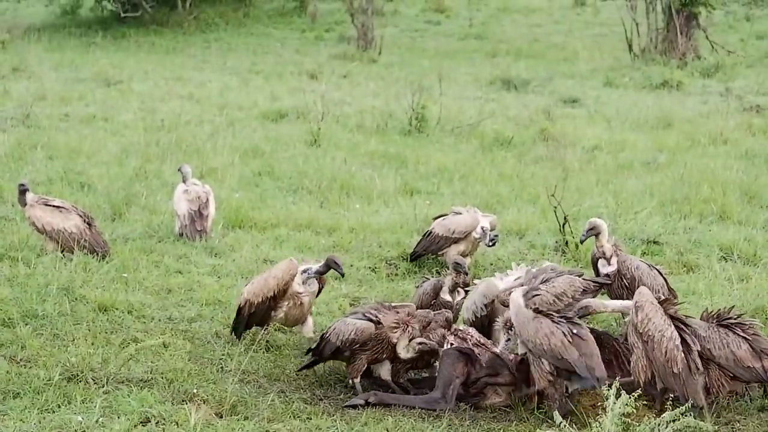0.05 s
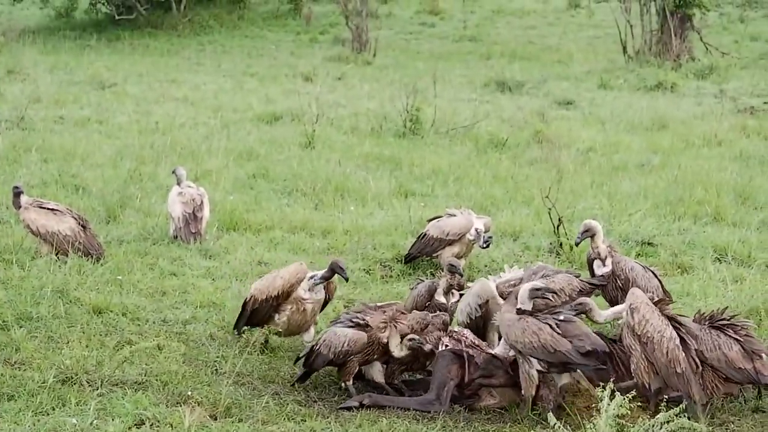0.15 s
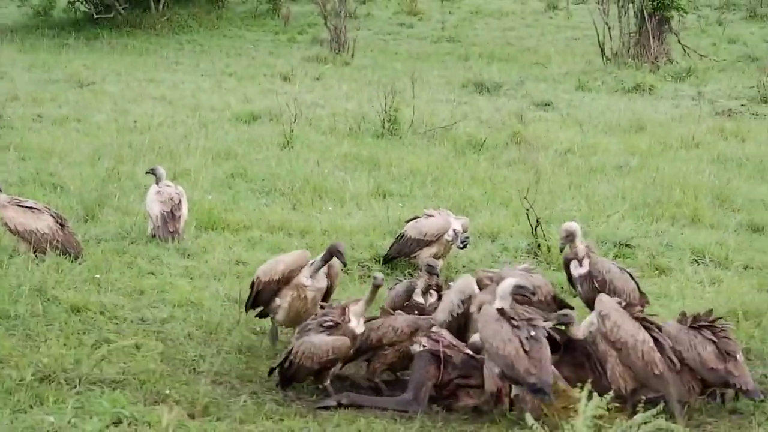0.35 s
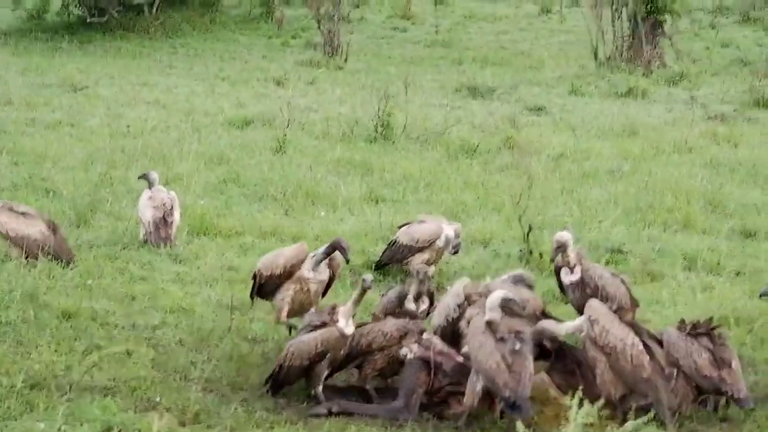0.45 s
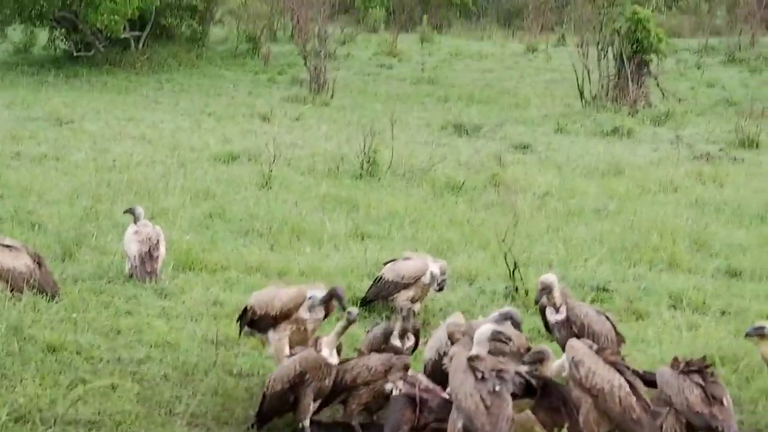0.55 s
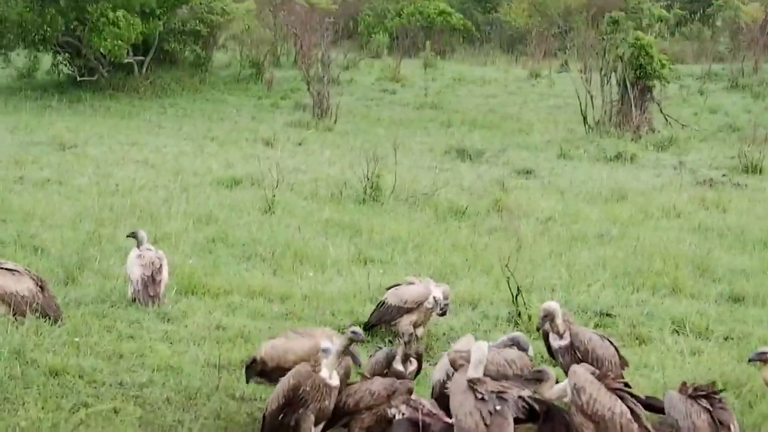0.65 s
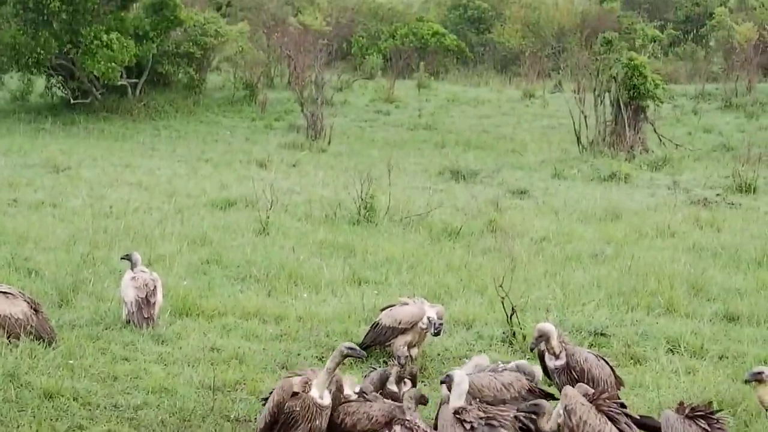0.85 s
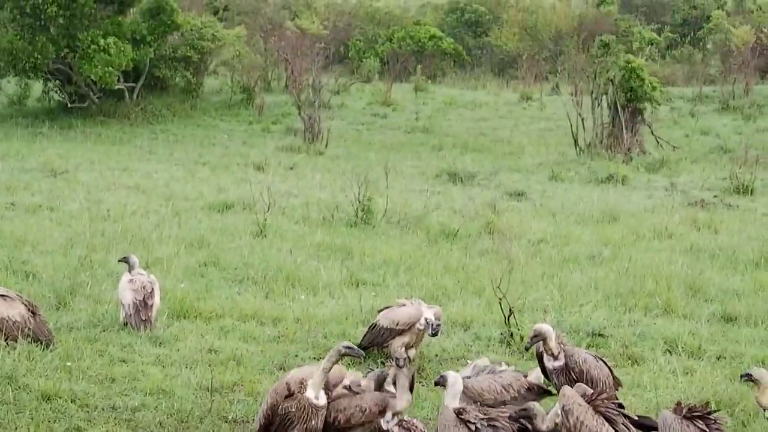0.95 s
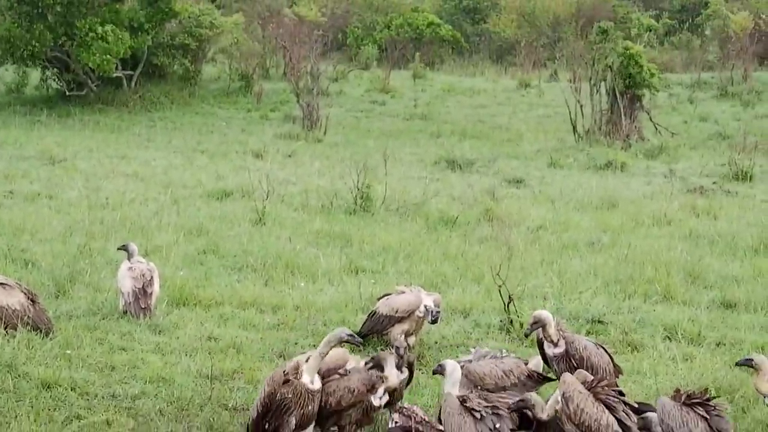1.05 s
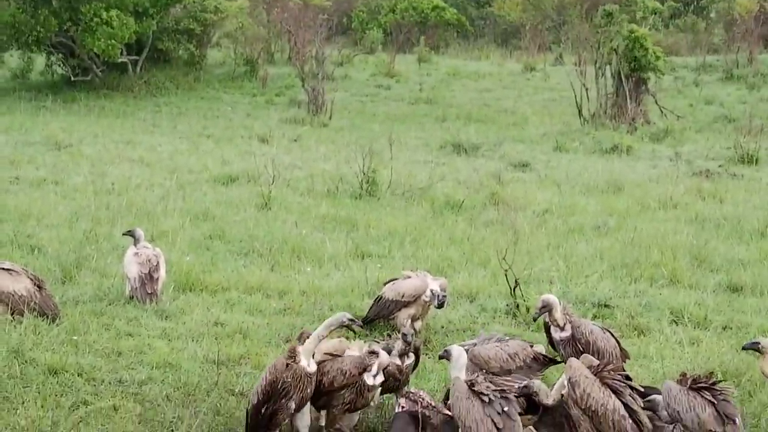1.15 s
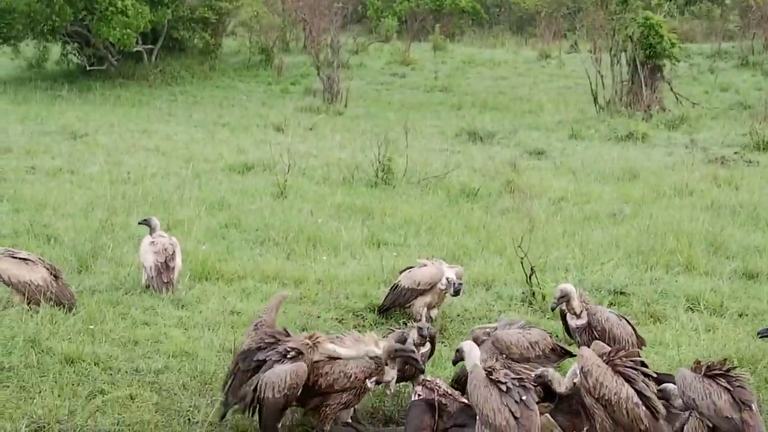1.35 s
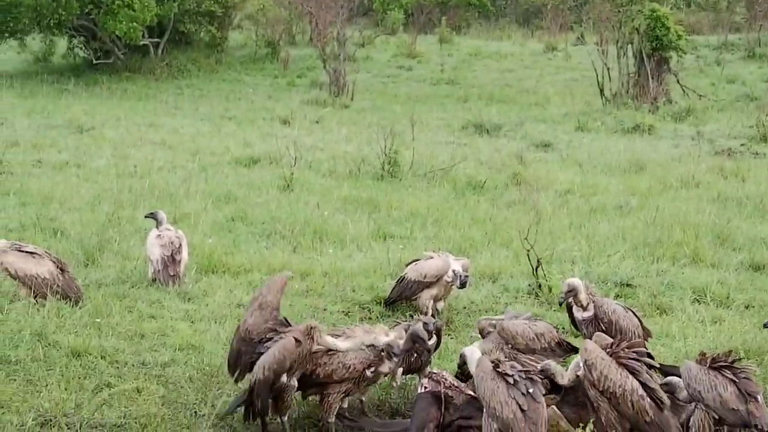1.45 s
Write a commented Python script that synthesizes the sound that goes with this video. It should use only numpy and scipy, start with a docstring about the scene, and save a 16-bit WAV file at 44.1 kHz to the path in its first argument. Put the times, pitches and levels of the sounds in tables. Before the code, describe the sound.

Feeding vultures hiss steadily in the background on open grassland. From about 0.2 to 0.9 seconds one bird holds a long, hoarse, sagging hiss, with harsher rasps over it at 0.2-0.5 and 0.6-0.8. A sharp, bright snap cuts through at 0.42. Quieter flock hissing continues, with small scuffs near 1.25 and 1.35, over soft low rumble, light wind and thin even hiss, until 1.5.

```python
"""One vulture holds a long hoarse hiss over a carcass on open grassland, some metres from a camera.
Two harsher rasps swell over it and the flock hisses on behind: fluttering air through throat resonances.
Narrow noise bands wheeze as the long hiss opens and closes; a sharp snap is a burst of decaying sines.
Knocks and scuffs are short noise bursts; shaped noise makes outdoor rumble, even hiss and light wind."""
import sys
import numpy as np
from scipy import signal
from scipy.fft import rfft, irfft
from scipy.io import wavfile

SR = 44100
rng = np.random.default_rng(int(sys.argv[2]) if len(sys.argv) > 2 else 0)


def master_out(mix):
    """Clip the mix to full scale and print it as 16-bit PCM to the path in sys.argv[1]."""
    frames = np.transpose(np.atleast_2d(mix))
    ceiling = np.clip(frames, -1, 1)
    pcm = np.round(ceiling * 32767).astype(np.int16)
    wavfile.write(sys.argv[1], SR, pcm)


N = 66150


def undb(db):
    """Amplitude factor of a level in dB."""
    return 10 ** (np.asarray(db) / 20)


def unit(x):
    """Scale to RMS 1."""
    return x / np.sqrt(np.mean(x ** 2))


def times():
    """Time of each sample in s."""
    return np.arange(N) / SR


def freqs():
    """Frequency of each spectral bin in Hz, at least 1."""
    return np.maximum(np.arange(N // 2 + 1) * SR / N, 1)


def curve(points):
    """Gain over time along (s, dB) points."""
    return undb(np.interp(times(), *np.array(points).T))


def colour(points):
    """Gain per frequency along (Hz, dB) points, on a log frequency axis."""
    hz, db = np.array(points).T
    return undb(np.interp(np.log(freqs()), np.log(hz), db))


def resonances(table):
    """Gain per frequency of steep resonances side by side, their powers summed."""
    power = 0
    for hz, width_hz, db in table:
        detune = 2 * (freqs() - hz) / width_hz
        power = power + undb(db) ** 2 / (1 + detune ** 2) ** 2
    return np.sqrt(power)


def shaped(x, gain):
    """Filter by a gain per frequency."""
    return irfft(rfft(x) * gain, N)


def noise():
    """White noise of spread 1."""
    return rng.standard_normal(N)


def walk(rate_hz):
    """Random drift of RMS 1, mostly slower than rate_hz."""
    return unit(shaped(noise(), 1 / (1 + (freqs() / rate_hz) ** 2) ** 2))


def stereo(mid, side, pan_db=0):
    """Left and right from mid and side; pan_db is left over right."""
    return np.array([(mid + side) * undb(pan_db / 2), (mid - side) * undb(-pan_db / 2)])


def effort(start_s, attack_s, hold_s, release_s, db, slope_db_per_s):
    """Push of air: linear attack and release, with a level that slopes in dB throughout."""
    t = times() - start_s
    attack = np.clip(t / attack_s, 0, 1)
    release = np.clip((attack_s + hold_s + release_s - t) / release_s, 0, 1)
    return attack * release * undb(db + slope_db_per_s * t)


def hiss(throat, flutter_hz, rough, low_hz):
    """Turbulent air with an uneven flutter, through a throat that passes little below low_hz: mid, side."""
    # Each row: frequency in Hz, side level in dB.
    side_points = [(500, -1), (1400, -23.5), (1850, -15), (2300, -22.5), (3100, -9.5), (4000, -14),
                   (4600, -10.5), (5500, -12.5), (9000, -9)]
    phase = 2 * np.pi * np.cumsum(flutter_hz * np.exp(.3 * walk(67))) / SR
    gate = 1 + rough * np.cos(phase)
    gain = resonances(throat) / np.sqrt(1 + (low_hz / freqs()) ** 20)
    mid = unit(shaped(noise() * gate, gain))
    side = unit(shaped(noise() * gate, gain))
    return np.array([mid, shaped(side, colour(side_points))])


def long_hiss():
    """One long push of air with a faint fast flutter, sagging as it is held."""
    # Start, attack, hold, release, all in seconds.
    timing = (.188, .022, .655, .035)
    # Throat. Each row: frequency in Hz, width in Hz, level in dB.
    throat = [(645, 780, -22), (975, 107, -10), (1083, 56, -9.5), (1368, 164, 2), (1700, 120, 0),
              (1900, 110, -3), (2040, 98, -6), (2275, 150, 2.5), (2600, 210, -3), (2820, 210, -7.5),
              (3180, 170, -21.5), (3860, 190, -16.5), (4470, 470, -17), (5600, 990, -26),
              (8000, 2900, -34.5)]
    push = effort(*timing, db=-32.5, slope_db_per_s=-5)
    return hiss(throat, flutter_hz=120.5, rough=0.045, low_hz=527) * push


def rasps():
    """Short pushes through a harsher throat, with a slower, deeper flutter and a slight level tremor."""
    # Each row: start, attack, hold, release in seconds, level in dB, slope in dB per s.
    pushes = [(0.219, 0.079, 0.038, 0.14, -23, 0), (0.573, 0.026, 0.1, 0.071, -34.5, 16)]
    # Throat. Each row: frequency in Hz, width in Hz, level in dB.
    throat = [(800, 410, -36), (1412, 150, -6), (1650, 184, -4), (1865, 83, 0), (2062, 125, 1.5),
              (2312, 142, 4), (2530, 220, -5.5), (2740, 330, -6.5), (3170, 570, -14.5), (3730, 96, -10),
              (3984, 150, -11), (4240, 360, -11.5), (4610, 220, -13.5), (5410, 165, -18),
              (6150, 420, -25.5), (7470, 1400, -31.5), (9050, 840, -31)]
    tremor_db = 0.5 * walk(50)
    air = hiss(throat, flutter_hz=64.64, rough=0.12, low_hz=610) * undb(tremor_db)
    return air * sum(effort(*row) for row in pushes)


def flock():
    """The birds behind: continuous fluttering air through broad throats, along a level curve."""
    # Each row: time in seconds, level in dB.
    level = [(0, -41), (.17, -40.5), (.55, -40.5), (.95, -42.5), (1.08, -44), (1.24, -44), (1.31, -47),
             (1.38, -45.5), (1.46, -48), (1.5, -45.5)]
    # Throats. Each row: frequency in Hz, width in Hz, level in dB.
    throats = [(1438, 117, 2.5), (1626, 350, -4.5), (1922, 194, -2.5), (2247, 265, 0), (2634, 364, 1),
               (3015, 590, -6), (4016, 630, -14), (4560, 870, -9.5), (5440, 1800, -18), (6570, 2800, -26)]
    return hiss(throats, flutter_hz=45, rough=0.079, low_hz=1250) * curve(level)


def vultures():
    """All hissing birds, mid and side turned into left and right."""
    return stereo(*(long_hiss() + rasps() + flock()), pan_db=0.44)


def wheezes():
    """The throat narrows as the long hiss opens and closes: one low resonance swells and fades."""
    # Each row: start in seconds, length in seconds, level in dB, frequency in Hz, width in Hz.
    table = [(.188, 0.042, -45, 1136, 130), (0.867, .042, -43, 1256, 70)]
    out = np.zeros(N)
    for start_s, length_s, db, hz, width_hz in table:
        swell = np.sin(np.pi * np.clip((times() - start_s) / length_s, 0, 1))
        out += undb(db) * swell * unit(shaped(noise(), resonances([(hz, width_hz, 0)])))
    return out


def snap():
    """Short modes swell for a few of their own cycles and die within milliseconds, each panned."""
    # Each row: frequency in Hz, 60 dB decay time in seconds, level in dB, left over right in dB.
    modes = [(1200, 0.015, -34, 8), (2480, 0.017, -21, 10), (3193, 0.0076, -12, -10),
             (3425, 0.0033, -15, -5), (4150, .006, -24, -4), (4360, 0.012, -16, -1),
             (5980, 0.0068, -20.5, -9), (6380, 0.009, -20, 3), (7360, 0.0063, -12.5, 4),
             (8140, 0.0027, -17, -11), (9320, 0.0074, -18.5, -11), (11900, 0.0044, -35, 3)]
    start_s, rise_cycles = .4209, 3.07
    right_lag_s, lag_from_hz = .00003, 3800  # higher modes reach the right side later
    out = np.zeros((2, N))
    for hz, t60_s, db, pan_db in modes:
        lag_s = right_lag_s * (hz > lag_from_hz)
        t = np.maximum(times() - start_s - np.array([[0], [lag_s]]), 0)
        rise_s = rise_cycles / hz
        rise = np.sin(np.pi / 2 * np.minimum(t / rise_s, 1)) ** 2
        decay = np.exp(-np.log(1000) * np.maximum(t - rise_s, 0) / t60_s)
        gain = undb(db + np.array([[pan_db], [-pan_db]]) / 2)
        out += gain * rise * decay * np.sin(2 * np.pi * hz * t)
    return out


def knocks():
    """Beaks, feet and wings in the crowd: a short noise burst in one resonance each."""
    # Each row: start in seconds, peak in dB, frequency in Hz, width in Hz, decay constant in seconds.
    table = [(0.42, -40.5, 161, 109, 0.005), (0.421, -37.5, 744, 180, 0.0062),
             (0.802, -35.5, 5100, 1500, 0.015), (0.904, -41, 770, 120, 0.0083), (.940, -44, 5000, 900, .04),
             (1.163, -43.5, 233, 131, 0.016), (1.225, -40.5, 3280, 600, 0.014),
             (1.249, -29, 2120, 1010, 0.0092), (1.255, -43, 800, 169, 0.0076),
             (1.266, -57, 1180, 400, 0.0051), (1.355, -30, 2500, 650, 0.0088)]
    attack_s = 0.00244
    out = np.zeros(N)
    for start_s, peak_db, hz, width_hz, decay_s in table:
        t = np.maximum(times() - start_s, 0)
        envelope = np.minimum(t / attack_s, 1) * np.exp(-t / decay_s)
        scuff = shaped(noise(), resonances([(hz, width_hz, 0)])) * envelope
        out += undb(peak_db) * scuff / abs(scuff).max()
    return out


def rumble():
    """Low outdoor noise that swells a little, its side part weaker than its mid."""
    # Each row: frequency in Hz, level in dB.
    spectrum = [(25, -5), (55, -20), (90, -9), (140, -5), (205, 3.5), (280, -2.5), (390, -1), (550, -6),
                (900, -6), (1500, -4), (4000, -22.5)]
    # Each row: time in seconds, level in dB.
    level = [(0, -53), (.3, -55), (.55, -52), (.7, -57), (.85, -58), (1.05, -56), (1.2, -51), (1.35, -52.5),
             (1.5, -54)]
    mid = unit(shaped(noise(), colour(spectrum)))
    side = unit(shaped(noise(), colour(spectrum)))
    return stereo(mid, undb(-5) * side) * curve(level)


def even_hiss():
    """Thin steady white noise, wide in stereo."""
    level_db, side_over_mid_db = -59, 2
    return undb(level_db) * stereo(noise(), undb(side_over_mid_db) * noise())


def wind():
    """Light wind on the microphone: separate low noise per side, on one shared level curve."""
    # Each row: time in seconds, level in dB.
    level = [(0, -64), (.85, -79), (1.0, -60), (1.25, -72), (1.5, -58.5)]
    centre_hz, width_hz = 90, 110
    gain = resonances([(centre_hz, width_hz, 0)])
    sides = np.array([unit(shaped(noise(), gain)) for _ in range(2)])
    return sides * curve(level)


def scene():
    """Sum of all sources, left and right."""
    return vultures() + wheezes() + snap() + knocks() + rumble() + even_hiss() + wind()


def record(dry):
    """The camera cuts the top steeply: an elliptic low-pass."""
    top_hz = 15900
    low_pass = signal.ellip(10, .2, 70, top_hz, fs=SR, output="sos")  # order, ripple dB, stop dB
    return signal.sosfilt(low_pass, dry)


dry = scene()
out = record(dry)
master_out(out)
```